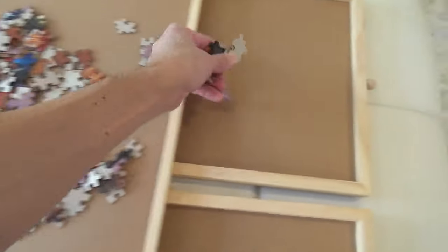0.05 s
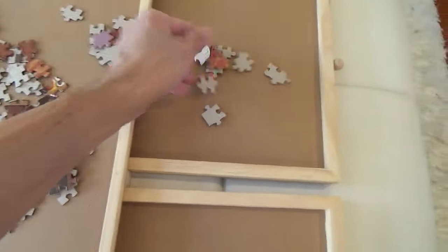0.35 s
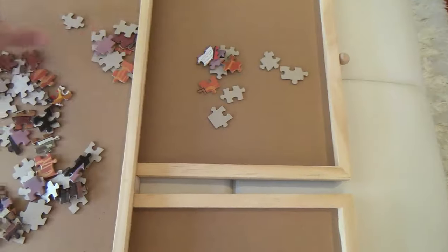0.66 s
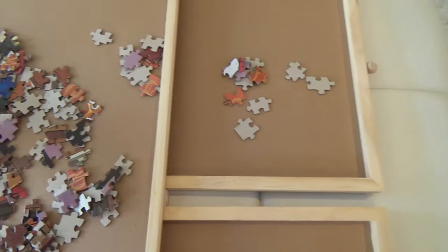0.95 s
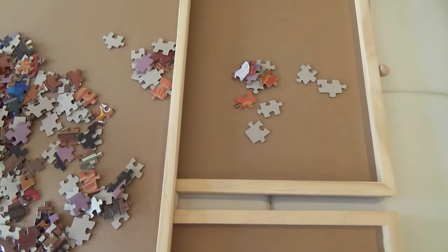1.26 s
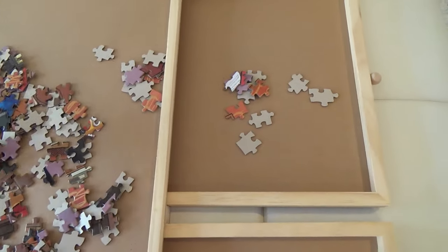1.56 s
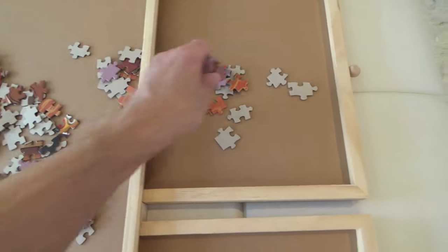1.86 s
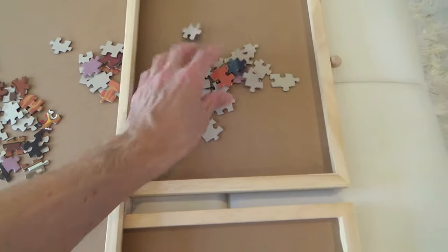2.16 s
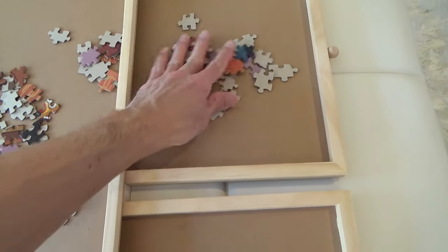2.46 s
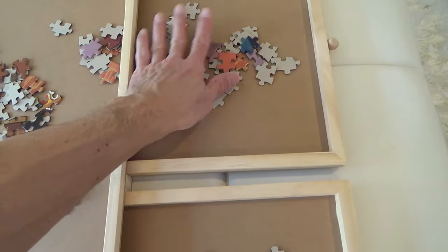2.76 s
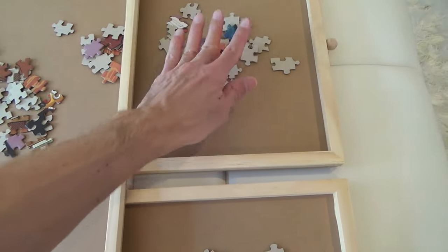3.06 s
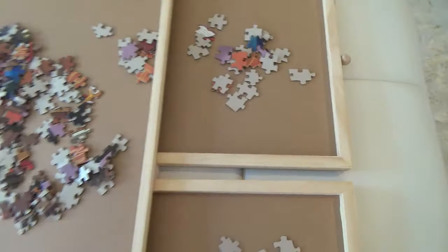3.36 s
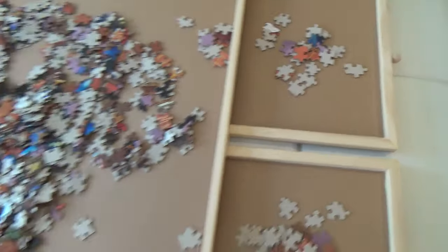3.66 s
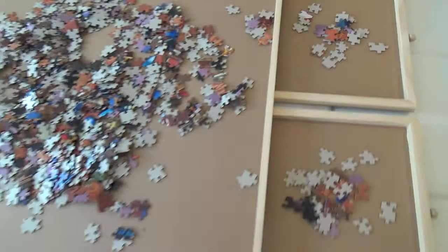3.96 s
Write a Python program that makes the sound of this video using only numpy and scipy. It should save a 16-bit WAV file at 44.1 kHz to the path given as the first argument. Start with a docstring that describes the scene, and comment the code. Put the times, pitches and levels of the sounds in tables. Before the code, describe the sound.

Cardboard puzzle pieces clatter into a wooden tray for the first half second, close by. From 0.8 to 1.8 seconds, further left, fingers rake a pile with a thud, dull rustling and brief skids. At 1.9 seconds a second handful clicks down and is spread with scraping and soft thuds. A last push comes at 2.9 seconds, fading by 3.2 into the small room's faint hush.

```python
"""Cardboard jigsaw pieces fall from a hand into a wooden tray, close to a stereo microphone.
The hand scoops more from a pile further left, drops those too and spreads them flat.
Each piece lands with a knock of the board, a dry snap of card edges and its own pitched clack;
sliding pieces make dense little knocks and snaps. The room is small and quiet, with a short tail,
a steady hush and very faint ticking from camera electronics."""
import sys
import numpy as np
from scipy import signal
from scipy.fft import rfft, irfft
from scipy.io import wavfile
from scipy.ndimage import uniform_filter1d

SR = 44100
rng = np.random.default_rng(int(sys.argv[2]) if len(sys.argv) > 2 else 0)


def wav_record(signal):
    """Record a signal, one row per channel, as 16-bit PCM in the file named by sys.argv[1]."""
    frames = np.transpose(np.atleast_2d(signal))
    bounded = np.clip(frames, -1, 1)
    # unit amplitude maps onto the largest positive 16-bit level
    quanta = np.round(bounded * 32767).astype(np.int16)
    wavfile.write(sys.argv[1], SR, quanta)


N = 176400

TRAY_CONTACTS_PER_S = 330
CLACK_CYCLES = 4.2  # for a piece's note to fall to 1/e
# pieces sliding in the tray, one list a stroke, relative levels: time_s, rumble_db, scratch_db
TRAY_STROKES = [
    [(.15,-34,-56),(.22,-41.5,-63),(.26,-39,-49),(.35,-32.5,-42),(.41,-42,-51),(.45,-42,-41),(.495,-46.5,-62),(.53,-65,-93)],
    [(1.955,-43,-51),(1.975,-40,-40),(2.05,-37,-39.5),(2.18,-44.5,-53.5),(2.3,-40,-41.5),(2.38,-42.5,-47.5),(2.44,-53.5,-54.5),(2.48,-49.5,-50.5),(2.54,-55.5,-66),(2.575,-54.5,-56),(2.62,-45,-47),(2.70,-53.5,-62.5),(2.77,-69,-79)],
    [(2.9,-38,-43),(2.908,-40,-37.5),(2.94,-46,-54),(3.0,-53,-58),(3.05,-50.5,-57),(3.11,-61,-68.5),(3.16,-71,-97)],
]


def amp(db):
    return 10 ** (np.asarray(db) / 20)


def hit_gain(db, over_s=0.0021):
    """Gain that gives a contact of energy 1 an rms of db, taken over over_s."""
    return np.sqrt(over_s * SR) * amp(db)


def unit_energy(x):
    return x / np.sqrt(np.sum(x ** 2) + 1e-20)


def curve_at(points, hz):
    """Interpolates a table on a log-frequency axis."""
    freqs, values = np.transpose(points)
    return np.interp(np.log(hz + 1), np.log(freqs + 1), values)


def add(mix, start_s, sound):
    part = mix[max(round(start_s * SR), 0):][:len(sound)]
    part += sound[:len(part)]


def colour(spectrum, size=2048):
    """Minimum-phase impulse response of a spectrum."""
    log_gain = np.log(amp(curve_at(spectrum, abs(np.fft.fftfreq(size, 1 / SR)))))
    response = np.fft.ifft(np.exp(np.conj(signal.hilbert(log_gain)))).real
    return unit_energy(response[:size // 2])


def note(hz, cycles, size=2048):
    """A damped ring that builds up within its first cycle."""
    turns = hz * np.arange(size) / SR
    return unit_energy(np.sin(2 * np.pi * turns) * (1 - np.exp(-2 * turns)) * np.exp(-turns / cycles))


def with_note(sound, hz, cycles, db):
    """Adds the struck object's own ring to a contact."""
    return unit_energy(sound + amp(db) * note(hz, cycles, len(sound)))


def contact(tone, decay_s, click, size=2048):
    """One impact of weight click, then a quickly dying rattle, both coloured by tone."""
    samples = np.arange(size)
    rattle = unit_energy(rng.standard_normal(size) * np.exp(-samples / SR / decay_s))
    return unit_energy(signal.fftconvolve(rattle + click * (samples == 0), tone))


def placed(x, balance, scatter_db=-15, scatter_hz=3600):
    """Pans a sound band by band; the treble reaches the microphone's two sides a little differently."""
    hz = np.fft.rfftfreq(N, 1 / SR)
    lean_db = curve_at(balance, hz)
    gains = amp(np.array([lean_db, -lean_db]) / 2)
    ripple = rfft(unit_energy(rng.standard_normal(60)), N)
    scatter = amp(scatter_db) * hz / np.hypot(hz, scatter_hz) * ripple
    return irfft(rfft(x) * (gains / gains.mean(0) + np.array([scatter, -scatter])), N)


def room_tone(level_db=-68):
    """Steady quiet air of the room, much alike on both sides."""
    # spectrum of the air: freq_hz, gain_db
    spectrum = [(25,-1.5),(247,-3.5),(1000,-6.5),(2100,-14.5),(2580,-13),(11000,-19.5),(14300,-75)]
    # likeness of left and right: freq_hz, coherence
    likeness = [(30,0.6),(200,.8),(3000,0.85),(10000,0.75)]
    hz = np.fft.rfftfreq(N, 1 / SR)
    common, apart = rfft(rng.standard_normal((2, N))) * amp(curve_at(spectrum, hz))
    coherence = curve_at(likeness, hz)
    mid = irfft(common, N)
    side = irfft(apart * np.sqrt((1 - coherence) / (1 + coherence)), N)
    return amp(level_db) * np.array([mid + side, mid - side]) / mid.std()


def camera_ticks(per_s=30):
    """Camera electronics tick faintly and regularly, dead centre."""
    # notes in each tick: pitch_hz, peak_db
    partials = [(2580,-70),(3010,-68)]
    clicks = np.diff(np.floor(np.arange(N + 1) * per_s / SR))
    rings = [(note(hz, cycles=10), db) for hz, db in partials]
    tick = sum(amp(db) * ring / ring.max() for ring, db in rings)
    return signal.oaconvolve(clicks, tick)[:N]


def room_tail(x, gap_s=0.0034, early_db=-19, early_s=0.081, size=26000):
    """The small room's diffuse tail, each band dying at its own speed."""
    # reverberation time: freq_hz, t60_s
    decay_times = [(150,.5),(1000,0.46),(9000,0.39)]
    # tail against the direct sound: freq_hz, level_db
    levels = [(150,-3.5),(1200,-14.5),(9000,-12)]
    noise = rng.standard_normal((3, size))  # left, right, common to both
    hz, t, bands = signal.stft(noise[:2] + noise[2], SR, nperseg=256)
    decay_rate = np.log(1000) / curve_at(decay_times, hz)[:, None]
    bands *= amp(curve_at(levels, hz)[:, None]) * np.exp(-decay_rate * t) * np.sqrt(decay_rate / SR)
    tail = signal.istft(bands, SR, nperseg=256)[1][:, :size]
    age_s = np.arange(size) / SR
    tail *= np.clip(age_s / gap_s - 1, 0, 1)
    tail *= 1 + amp(early_db) * np.exp(-age_s / early_s)  # early echoes off the table and the rim
    return signal.fftconvolve(x, tail, axes=1)[:, :N]


def wood_ring(knock, ring_db, size=4096):
    """Adds the tray's modes to a knock; the landing spot sets their sign and weight, the load their pitch."""
    # modes of the tray: pitch_hz, weight_db
    modes = [(425,-7.5),(692,-5),(940,0.5),(1125,-3.5),(1205,-1),(1298,0),(1565,-2.5),(2050,-0.5),(2170,-6.5),(2650,-4.5)]
    # their decay: pitch_hz, t60_s
    decay_times = [(420,.11),(940,.06),(2000,.04)]
    t = np.arange(size) / SR
    weights = rng.choice([-1, 1], len(modes)) * (1 + 0.41 * rng.standard_normal(len(modes)))
    loads = rng.uniform(.985, 1.015, len(modes))
    ring = np.zeros(size)
    for weight, load, (hz, db) in zip(weights, loads, modes):
        decay = np.exp(-np.log(1000) * t / curve_at(decay_times, hz))
        ring += weight * amp(db) * decay * np.sin(2 * np.pi * hz * load * t)
    return unit_energy(np.pad(knock, (0, size - len(knock))) + amp(ring_db) * unit_energy(ring))


def friction(strokes, column, per_s, grain, rub_db, variants=8, spread_db=4.5):
    """Small contacts of uneven size over a smooth rub, following one level column of the strokes."""
    t = np.arange(N) / SR
    level = sum(amp(np.interp(t, stroke[:, 0], stroke[:, column], left=-200, right=-200))
                for stroke in map(np.array, strokes))
    sizes = amp(spread_db * np.minimum(rng.exponential(1, N), 4))
    force = sizes * (rng.random(N) < per_s / SR) * rng.choice([-1, 1], N)
    force += amp(rub_db) * np.sqrt(per_s / SR) * rng.standard_normal(N)
    running_rms = np.sqrt(abs(uniform_filter1d(force ** 2, size=1300)) + 1e-9)
    force *= level / running_rms
    variant = rng.integers(0, variants, N)
    return sum(signal.oaconvolve(force * (variant == k), grain())[:N] for k in range(variants))


def pieces(hits, strokes, knock, snap, rumble_db, scratch_db, per_s, rub_db):
    """Sliding strokes and single hits share the same knocks and snaps; each hit also clacks."""
    out = amp(rumble_db) * friction(strokes, 1, per_s, knock, rub_db)
    out += amp(scratch_db) * friction(strokes, 2, per_s, snap, rub_db)
    for start_s, knock_db, snap_db, clack_hz, clack_db in hits:
        add(out, start_s, hit_gain(knock_db) * knock())
        add(out, start_s, hit_gain(snap_db) * snap())
        add(out, start_s, hit_gain(clack_db) * note(clack_hz, CLACK_CYCLES))
    return out


def hand(board_hz=150.2, board_cycles=2.24, press_db=-16):
    """The board's lowest mode thuds under the hand and murmurs while the palm spreads the pieces."""
    # the hand's weight coming down: start_s, level_db
    thuds = [(0.925,-35.5),(1.957,-41),(2.037,-39.5),(2.251,-38),(2.904,-37.5),(2.922,-54)]
    # spectrum of a thud: freq_hz, gain_db
    spectrum = [(45,-10),(150,2),(380,-1),(1500,-47)]
    tone = colour(spectrum)
    murmur = lambda: note(board_hz * rng.uniform(0.81, 1.46), board_cycles)
    out = amp(press_db) * friction(TRAY_STROKES[1:], 1, TRAY_CONTACTS_PER_S, murmur, rub_db=3, variants=3)
    for start_s, level_db in thuds:
        thud = with_note(contact(tone, decay_s=0.0075, click=0.5), board_hz, board_cycles, db=-12)
        add(out, start_s, hit_gain(level_db) * thud)
    return out


def skids(slips_per_s=400, pitch_spread=.13):
    """Dragged pieces stick and slip unevenly; each slip rings at a slightly different pitch."""
    # judders and squeaks on the board: start_s, length_s, pitch_hz, level_db
    drags = [(0.845,.07,404,-39),(0.867,.045,1820,-38),(0.966,.07,351,-44),(1.027,.035,1790,-38),(1.144,0.0158,670,-36),(1.667,.01,5900,-57),(1.707,.024,6500,-51)]
    out = np.zeros(N)
    for start_s, length_s, pitch_hz, level_db in drags:
        count = int(length_s * slips_per_s) + 1
        for k, (late, bend) in enumerate(rng.random((count, 2))):
            progress = (k + late) / count
            swell = np.sqrt(np.sin(np.pi * progress))
            slip = note(pitch_hz * (1 + pitch_spread * (2 * bend - 1)), CLACK_CYCLES)
            add(out, start_s + progress * length_s, hit_gain(level_db) * swell * slip)
    return out


def pile():
    """Fingers rake pieces together on the duller main board."""
    # pieces knocked about: start_s, knock_db, snap_db, clack_hz, clack_db
    nudges = [(.9222,-23.5,-29,874,-33.5),(1.1962,-46,-35,930,-36),(1.2892,-41,-73,664,-36),(1.3113,-45.5,-52,790,-41.5),(1.557,-31.5,-35.5,450,-34.5),(1.5849,-34,-41.5,1270,-33.5),(1.6128,-41,-66,440,-38.5),(1.714,-34.5,-41,1004,-39.5)]
    # raking, one list a stroke, relative levels: time_s, rumble_db, scratch_db
    scoops = [
        [(.83,-62,-100),(.865,-29.5,-37.5),(.905,-30,-43.5),(.955,-36,-50.5),(1.04,-36,-42.5),(1.11,-34,-48.5),(1.145,-35.5,-43.5),(1.18,-46,-61),(1.21,-33,-41),(1.28,-48.5,-57),(1.35,-46,-66),(1.41,-75,-81)],
        [(1.56,-58,-70),(1.6,-49,-58),(1.645,-54,-68),(1.675,-42.5,-59),(1.70,-66,-72),(1.73,-39,-59),(1.78,-74,-73)],
    ]
    # spectra of the board and the card edges: freq_hz, gain_db
    board_spectrum = [(60,-23),(150,-4),(310,-2),(430,1),(850,4.5),(1300,2.5),(2000,-5),(3600,-23),(12000,-47)]
    card_spectrum = [(200,-10),(3000,5),(6200,1.5),(7300,-1),(11000,-8.5)]
    board, card = colour(board_spectrum), colour(card_spectrum)
    knock = lambda: wood_ring(contact(board, decay_s=0.0063, click=0.31), ring_db=-13.5)
    snap = lambda: contact(card, decay_s=0.0033, click=0.05)
    return pieces(nudges, scoops, knock, snap, rumble_db=-7, scratch_db=-0.5, per_s=900, rub_db=-7.5)


def tray():
    """Pieces fall and slide on the tray's ringing floor; each card edge ticks at its own pitch."""
    # pieces landing: start_s, knock_db, snap_db, clack_hz, clack_db
    drops = [(.0005,-38,-54.5,934,-28.5),(.0751,-21,-38.5,986,-32),(.1135,-38,-70,920,-32),(.1382,-26.5,-48,930,-40),(.1492,-22.5,-29,1160,-44),(.1547,-33,-44,923,-31.5),(.1588,-27,-26.5,1360,-35),(.2027,-34,-45,1480,-44),(.2367,-29,-40,910,-43),(.2468,-34,-35,1260,-35),(.2555,-23.5,-26,1030,-42),(.2677,-32,-31,2070,-35.5),(.3049,-29.5,-36.5,1660,-36),(.33,-60,-28,1290,-39),(.3586,-48,-27.5,2120,-43),(.3956,-32,-33.5,1620,-44),(.4032,-31.5,-36,624,-37),
             (1.9036,-23.5,-48.5,1150,-36),(1.9551,-34,-45,395,-38.5),(1.9693,-41,-34,1840,-37.5),(1.9973,-28.5,-27,1960,-28),(2.0305,-47,-28,2000,-29.5),(2.036,-34,-28,1700,-32),(2.0543,-25.5,-32,3830,-31.5),(2.1025,-41,-30,2080,-39),(2.1243,-33.5,-35,1090,-34.5),(2.3331,-37.5,-50,1590,-36.5),(2.4209,-40,-52,1270,-56),(2.5925,-34,-41,1600,-36),(2.9045,-39.5,-36.5,1090,-42),(2.9196,-34,-33.5,2720,-33),(2.9727,-38.5,-37.5,2040,-42.5)]
    # card edges clicking together: start_s, level_db
    ticks = [(.2737,-27),(0.2899,-38),(0.351,-29),(0.384,-34),(1.9904,-28),(2.0902,-41),(2.1439,-31),(2.1684,-46),(2.2227,-39.5),(2.3065,-33.5),(2.32,-50),(2.376,-39.5),(2.65,-40)]
    # spectra of the tray floor and the card edges: freq_hz, gain_db
    board_spectrum = [(60,-33),(150,-17),(280,-7.5),(400,-3),(620,0.5),(2100,-1.5),(3100,-5.5),(4300,-17.5),(12000,-54)]
    card_spectrum = [(200,0),(3000,1),(5700,1.5),(7000,2),(9200,4.5),(11000,-0.5)]
    board, card = colour(board_spectrum), colour(card_spectrum)
    knock = lambda: wood_ring(contact(board, decay_s=0.0029, click=0.3), ring_db=0)
    snap = lambda: with_note(contact(card, decay_s=0.0019, click=0.094),
                             hz=rng.uniform(4776, 7360), cycles=15.6, db=-8)
    out = pieces(drops, TRAY_STROKES, knock, snap,
                 rumble_db=-2.5, scratch_db=-2.5, per_s=TRAY_CONTACTS_PER_S, rub_db=-0.5)
    for start_s, level_db in ticks:
        add(out, start_s, hit_gain(level_db) * snap())
    return out


def scene():
    """From the microphone: the tray a little left of centre, the pile further left, the room around."""
    # balance of each spot: freq_hz, left_minus_right_db
    tray_balance = [(60,1.5),(300,4),(1200,4),(5000,-1)]
    pile_balance = [(60,4),(600,7.5),(5000,4.3)]
    direct = placed(tray() + hand(), tray_balance) + placed(pile() + skids(), pile_balance)
    low_cut = signal.butter(2, 100, "high", fs=SR, output="sos")  # boards radiate little below 100 Hz
    direct = signal.sosfilt(low_cut, direct)
    return direct + room_tail(direct) + room_tone() + camera_ticks()


def record(dry):
    """The recorder's band limit, a steep cut at 11130 Hz."""
    low_pass = signal.firwin(301, 11130, window=("kaiser", 8), fs=SR)
    return signal.oaconvolve(dry, low_pass[None], "same")


dry = scene()
out = record(dry)
wav_record(out)
```